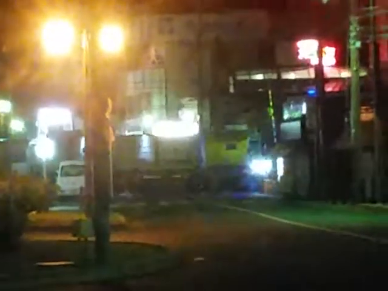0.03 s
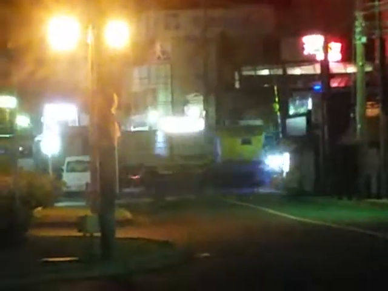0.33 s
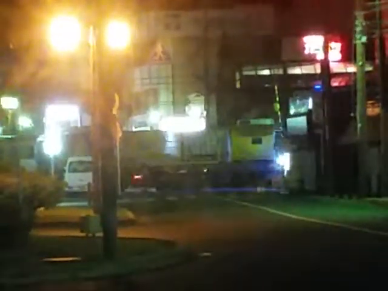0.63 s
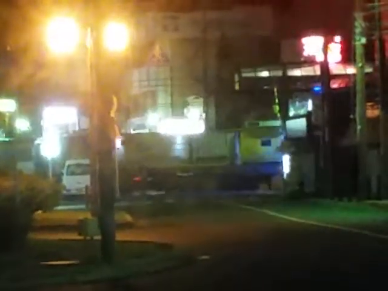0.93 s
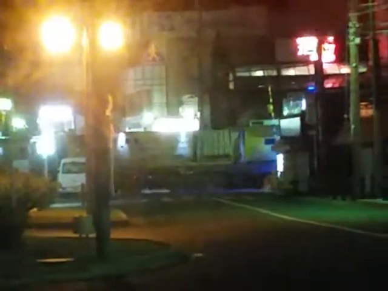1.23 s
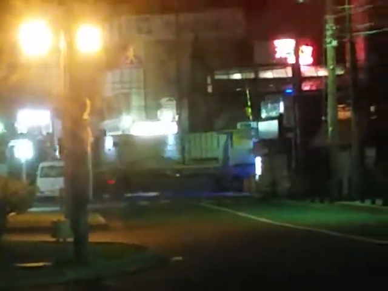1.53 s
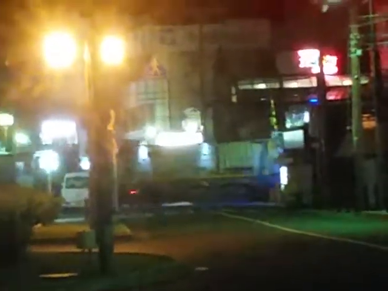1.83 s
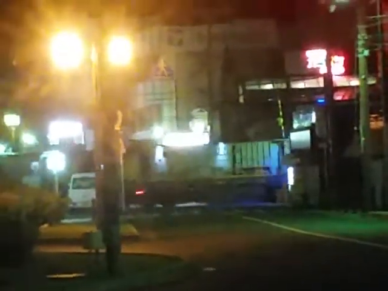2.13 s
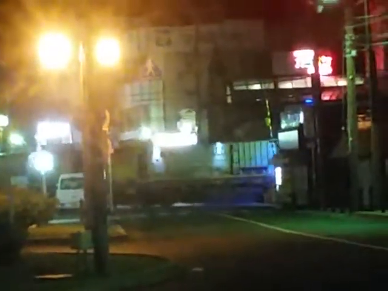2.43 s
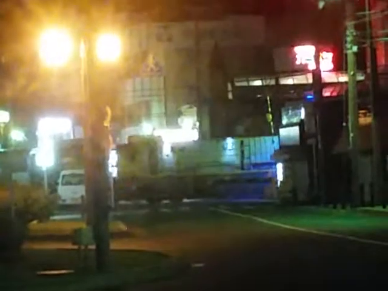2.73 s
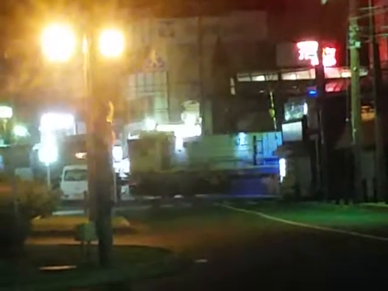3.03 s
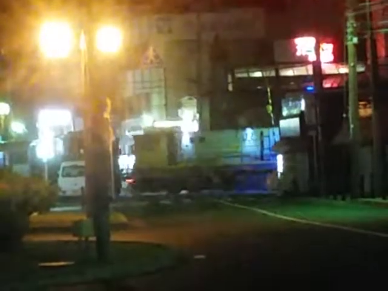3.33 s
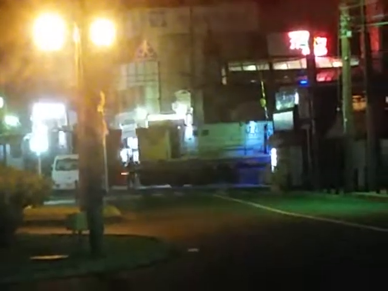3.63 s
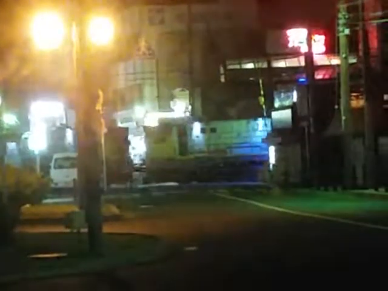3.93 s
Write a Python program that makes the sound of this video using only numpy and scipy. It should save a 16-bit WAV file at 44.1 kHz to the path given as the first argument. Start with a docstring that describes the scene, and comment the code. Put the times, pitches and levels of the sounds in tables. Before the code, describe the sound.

The low, steady diesel engine of a rail vehicle creeps past some way off among buildings. A faint puff of air comes first, then wind bumps the microphone, while soft fan hiss and whine swell and recede.

```python
"""A diesel rail maintenance vehicle creeps through a distant crossing at night, engine speed steady.
From the start, firings ring the exhaust pipe, low notes swell and fade between the buildings, and
fans, gears and pumps hiss and whine, mostly from the right. At 0.2-0.4 s it lets off compressed air.
From 0.6 to 1.9 s a light gust buffets the left microphone port. The machinery is loudest near 2.5 s,
in the open crossing, then recedes while the exhaust chugs on."""
import sys
import numpy as np
from scipy import signal
from scipy.fft import rfft, irfft, next_fast_len
from scipy.io import wavfile
from scipy.ndimage import map_coordinates

SR = 44100
rng = np.random.default_rng(int(sys.argv[2]) if len(sys.argv) > 2 else 0)


def put_to_file(sound):
    """Save the sound as 16-bit audio at rate SR, in the file named by the first command-line argument."""
    columns = np.atleast_2d(sound).T  # one column per channel
    safe = np.clip(columns, -1, 1)
    whole_steps = np.round(safe * 32767)
    wavfile.write(sys.argv[1], SR, whole_steps.astype(np.int16))


N = 176400

# exhaust and street rumble: (frequency [Hz], relative density [dB])
RUMBLE_SPECTRUM = [(12, -45), (28, -16.5), (50, -5), (90, -0.5), (140, -1.5), (220, -1), (300, -6.5),
                   (370, -17.5), (500, -17.5), (650, -29), (1200, -53.5), (3000, -100)]


def amp(db):
    """Decibels to gain."""
    return 10 ** (np.asarray(db) / 20)


def unit(x):
    """Scale to rms 1."""
    return x / np.sqrt(np.mean(x ** 2) + 1e-20)


def along(points, hz):
    """(Hz, value) points on a log axis."""
    f, v = np.transpose(points)
    return np.interp(np.log(hz + 1), np.log(f + 1), v)


def curves(rows):
    """One value per sample for each column after the time."""
    s, *cols = np.transpose(rows)
    return [np.interp(np.arange(N) / SR, s, c) for c in cols]


def wobble(rate):
    """A smooth random curve, rate knots a second."""
    return map_coordinates(rng.standard_normal(1024), [np.arange(N) * rate / SR], mode="wrap")


def filtered(x, response):
    """x times a complex response of frequency."""
    m = next_fast_len(N + SR // 2)
    return irfft(rfft(x, m) * response(np.fft.rfftfreq(m, 1 / SR)), m)[..., :N]


def noise(spectrum, gate=1):
    """Gated white noise, coloured, at rms 1."""
    return unit(filtered(gate * rng.standard_normal(N), lambda hz: amp(along(spectrum, hz))))


def note(turns, multiple, fade_db, smear_rad, rate_hz):
    """One exhaust tone; changing reflections bend level and phase."""
    phase = 2 * np.pi * (multiple * turns + rng.random()) + smear_rad * wobble(rate_hz)
    return np.sqrt(2) * amp(fade_db * wobble(rate_hz)) * np.sin(phase)


def exhaust_notes(turns):
    """Strong and weak tones locked to the crank."""
    strong_multiples = [2, 4, 6, 7, 9, 10, 18]  # (frequency [x crank rate])
    strong_levels = [(0, -42, -39, -31.5, -35, -42, -50.5, -60.5),
                     (0.402, -40, -37, -33, -36, -41, -51.5, -60),
                     (.8, -44.5, -35.5, -34.5, -50.5, -47, -43, -68),
                     (1.249, -42, -35.5, -37.5, -46.5, -42.5, -43, -66.5),
                     (1.48, -45.5, -36.5, -32.5, -53, -44, -43.5, -53),
                     (1.62, -33.5, -36.5, -34, -49, -44, -42.5, -55),
                     (1.761, -34, -38, -38.5, -39, -40, -47.5, -47.5),
                     (1.999, -33.5, -37.5, -49.5, -36.5, -46, -55, -53.5),
                     (2.25, -34, -42, -38, -44.5, -45.5, -49, -50),
                     (2.548, -33.5, -39.5, -37, -40, -44, -52.5, -52),
                     (2.952, -36.5, -36.5, -45, -35, -47, -47, -56.5),
                     (3.298, -42, -37, -36.5, -39, -46, -48.5, -59.5),
                     (3.7, -38.5, -35.5, -39.5, -54.5, -46.5, -48.5, -60.5),
                     (4, -34.5, -31.5, -36, -63, -45.5, -41.5, -54)]  # (time [s], relative level [dB] of each strong multiple)
    weak_notes = [(1, -58), (1.5, -54.5), (3, -57), (3.5, -52.5), (4.5, -45.5), (5, -41), (8, -48),
                  (10.5, -52), (11, -56.5), (12, -57), (13, -59.5), (14, -56)]  # (frequency [x crank rate], relative level [dB])
    strong = sum(amp(db - 1.48) * note(turns, multiple, fade_db=0.25, smear_rad=0.053, rate_hz=3)
                 for multiple, db in zip(strong_multiples, curves(strong_levels)))
    weak = sum(amp(db - 3.5) * note(turns, multiple, fade_db=2.0, smear_rad=0.63, rate_hz=2.11)
               for multiple, db in weak_notes)
    return strong + weak


def exhaust_puffs(turns):
    """Rumble and roar puff twice a turn; the roar rises once clear of the buildings."""
    rumble_level = [(0, -42.5), (.7, -38.5), (1.5, -38.5), (2.1, -39.5), (2.6, -39), (3.2, -39), (4, -38.5)]  # (time [s], level [dB])
    roar_level = [(0, -58), (.6, -55), (1, -48.5), (1.7, -51.5), (2.3, -52), (2.9, -49), (3.5, -51),
                  (4, -54)]  # (time [s], level [dB])
    roar_spectrum = [(150, -38.5), (280, -11.5), (350, 2), (430, -2), (510, -3), (650, -16), (1200, -47),
                     (3000, -89.5)]  # (frequency [Hz], relative density [dB])
    puffs = amp(1.8 * np.cos(2 * np.pi * 2 * turns) + 2.1 * np.cos(2 * np.pi * turns))
    rumble = amp(curves(rumble_level)[0]) * noise(RUMBLE_SPECTRUM, puffs)
    roar = amp(curves(roar_level)[0]) * noise(roar_spectrum, puffs)
    return rumble + roar


def exhaust_chug(turns):
    """Uneven firings, two a turn, ring the muffled pipe and echo off walls."""
    cylinders = [(-0.0012, 3.5), (0.077, -1), (.16, 3), (-0.11, -1.5)]  # (lag [firing intervals], strength [dB])
    pipe_modes = [(143, 51.6, -1.5), (213, 95, 0.5), (288, 60, -1.5), (397, 59, -15)]  # (frequency [Hz], width [Hz], gain [dB])
    wall_echoes = [(0.018, -11), (.057, -7.5), (0.12, -9.5)]  # (delay [s], gain [dB])
    chug_level = [(0, -42.5), (.5, -40.5), (1, -43), (1.6, -38), (2.1, -42), (2.6, -37.5), (3.3, -37),
                  (4, -41.5)]  # (time [s], level [dB])
    scatter_db, jitter_s, muffler_hz = 2.5, 0.00032, 492
    firings = np.arange(int(2 * turns[-1]))
    lag, strength_db = np.array(cylinders)[firings % len(cylinders)].T
    late, strong = rng.standard_normal((512, 2))[:len(firings)].T
    onsets_s = np.interp(firings + lag, 2 * turns, np.arange(N) / SR) + jitter_s * late
    onset_samples = np.clip(onsets_s * SR, 0, N - 1).astype(int)
    pulses = np.bincount(onset_samples, amp(strength_db + scatter_db * strong), N)

    def pipe_and_walls(hz):
        pipe = sum((-1) ** k * amp(db) * 1j * hz * width / (centre ** 2 - hz ** 2 + 1j * hz * width)
                   for k, (centre, width, db) in enumerate(pipe_modes))
        walls = 1 + sum(amp(db) * np.exp(-2j * np.pi * hz * delay_s) for delay_s, db in wall_echoes)
        return pipe * walls

    muffler = signal.butter(4, muffler_hz, fs=SR, output="sos")
    chug = signal.sosfilt(muffler, filtered(pulses, pipe_and_walls))
    return amp(curves(chug_level)[0]) * unit(chug)


def whine(hz, smear_rad, throb_db, throb_hz=5.3):
    """Gear or pump tone: throbs, flutters, wavers in phase."""
    t = np.arange(N) / SR
    level_db = throb_db * np.sin(2 * np.pi * throb_hz * t + 1.6 * wobble(2.6))
    flutter_db = 1.1 * wobble(7) + 1.1 * wobble(45)
    phase = 2 * np.pi * (hz * t + rng.random()) + smear_rad * wobble(14)
    return unit(amp(level_db + flutter_db) * np.sin(phase))


def machinery(turns):
    """Whines, high hiss and faintly clattering fan rush, loudest mid-crossing."""
    whine_tones = [(985, -70, .5, 1), (1182, -74, .2, 1), (1379, -69, .4, 1), (1569, -71, 2.2, 1),
                   (1631, -61, .3, 1), (2005, -76, 1.4, 2), (2165, -68, .7, 4), (2360, -78, 2, 1),
                   (2444, -76.5, 1.6, 1), (2562, -75.5, .3, 1), (2719, -76, .3, 1), (2758, -80, .4, 1),
                   (2836, -80, .3, 1), (2875, -79.5, .4, 1), (3149, -85, .4, 1), (3623, -85.5, .3, 1),
                   (3741, -81, .3, 1)]  # (frequency [Hz], level [dB], phase waver [rad], throb [dB])
    whine_gain = [(0, -3), (.6, -2), (1.1, 0), (1.8, 1.5), (2.6, 1.5), (3.1, -1.5), (4, -4)]  # (time [s], gain [dB])
    hiss_level = [(0, -88.5), (1, -79), (1.7, -70.5), (2.1, -72), (2.5, -68.5), (3.1, -77), (4, -89)]  # (time [s], level [dB])
    hiss_spectrum = [(1500, -33.5), (2600, -3.5), (3250, -4), (3750, 4.5), (4150, 1.5), (4400, -18),
                     (4650, -8.5), (5000, -8.5), (5300, -21), (5600, -31.5), (6300, -42), (15000, -57)]  # (frequency [Hz], relative density [dB])
    fan_level = [(0, -57.5), (.5, -56), (1, -55), (1.7, -55.5), (2.5, -54.5), (3, -56), (3.5, -55.5),
                 (4, -57.5)]  # (time [s], relative level [dB])
    fan_spectrum = [(200, -9), (600, -3), (800, 2), (1200, 1.5), (1500, 2.5), (1680, 2.5), (1980, -4.5),
                    (2450, -3.5), (2800, -10.5), (3200, -16.5), (3800, -16.5), (4150, -20), (4450, -29),
                    (5100, -30.5), (5600, -48.5), (6500, -57), (15000, -51.5)]  # (frequency [Hz], relative density [dB])
    clatter = amp(0.32 * np.cos(2 * np.pi * 2 * turns) + 0.76 * wobble(90) + 0.73 * wobble(8.3))
    whines = sum(amp(db) * whine(hz, smear_rad, throb_db)
                 for hz, db, smear_rad, throb_db in whine_tones)
    hiss = amp(curves(hiss_level)[0] + 1.1 * wobble(11)) * noise(hiss_spectrum)
    fan = amp(curves(fan_level)[0] + 2.5) * noise(fan_spectrum, clatter)
    return fan + hiss + amp(curves(whine_gain)[0]) * whines


def street():
    """Diffuse rumble and wash from the buildings, at one port."""
    wash_spectrum = [(100, 3.5), (500, -5), (750, -5.5), (1200, -10), (1700, -9.5), (2100, -13.5),
                     (3800, -23), (4500, -35.5), (5000, -32), (5500, -46), (6300, -53), (15000, -38.5)]  # (frequency [Hz], relative density [dB])
    rumble = amp(-48.5 + 4.0 * wobble(10)) * noise(RUMBLE_SPECTRUM)
    wash = amp(-56.0 + 0.71 * wobble(20)) * noise(wash_spectrum)
    return rumble + wash


def air_release():
    """Compressed air swells, shuts off and lingers between the buildings."""
    air_spectrum = [(1500, -27), (3000, -6.5), (4300, -3), (5300, 1), (5800, -8.5), (6700, -24.5),
                    (8300, -32.5), (15000, -20.5)]  # (frequency [Hz], relative density [dB])
    open_s, shut_s, peak_db, echo_db = 0.2, 0.405, -68.5, -15
    rise_db_per_s, fall_db_per_s, echo_db_per_s = 134, 451, 32.5
    t = np.arange(N) / SR
    swell_db = -rise_db_per_s * np.maximum(shut_s - t, 0)
    since_shut_s = np.maximum(t - shut_s, 0)
    jet = amp(swell_db - fall_db_per_s * since_shut_s)
    echo = amp(echo_db + swell_db - echo_db_per_s * since_shut_s)
    return amp(peak_db) * (t > open_s) * np.hypot(jet, echo) * noise(air_spectrum)


def wind_gust(lump_db=1.8, right_db=-32.5):
    """Lumpy buffeting and single thumps, nearly all on the left port."""
    gust_level = [(0, -50.5), (.6, -42), (.8, -44), (.92, -29.5), (1.04, -41), (1.2, -32.5), (1.5, -31.5),
                  (1.66, -33), (1.9, -44.5), (2.4, -46.5), (4, -45)]  # (time [s], level [dB])
    buffet_spectrum = [(10, -38), (25, -9.5), (50, 9), (120, -1), (200, -8), (300, -4.5), (450, -24),
                       (700, -42), (2000, -83.5)]  # (frequency [Hz], relative density [dB])
    wind_thumps = [(.762, -25, 90, .004), (.862, -23, 125, .004), (.918, -16, 75, .0045),
                   (1.264, -20, 135, .006), (1.349, -18.5, 100, .004), (1.451, -11.5, 130, .003),
                   (1.521, -21.5, 190, .007), (1.612, -22, 105, .004), (1.688, -23, 90, .004)]  # (time [s], level [dB], pitch [Hz], half width [s])
    buffet = amp(curves(gust_level)[0] + lump_db * wobble(22)) * noise(buffet_spectrum)
    for centre_s, db, hz, half_width_s in wind_thumps:
        offset_s = np.arange(N) / SR - centre_s
        envelope = amp(db) * np.exp(-(offset_s / half_width_s) ** 2 / 2)
        buffet -= envelope * np.sin(2 * np.pi * hz * offset_s)
    return np.array([buffet, amp(right_db) * buffet])


def from_right(x, left_lead_s=0.00018):
    """Mono to stereo; the left port is shaded, most in the treble."""
    port_balance = [(60, -2.5), (110, -3.5), (170, -4.5), (260, -7.5), (500, -5), (700, -13.5),
                    (1100, -21.5), (1800, -24.5), (4700, -26)]  # (frequency [Hz], left minus right [dB])

    def ports(hz):
        ratio = amp(along(port_balance, hz))
        left = ratio * np.exp(2j * np.pi * hz * left_lead_s)
        return np.array([left, np.ones_like(hz)]) * 2 / (1 + ratio)

    return filtered(x, ports)


def scene():
    """Vehicle, street and wind, in stereo."""
    crank_hz, relative_drift = 30.22, 0.00077
    turns = np.cumsum(crank_hz * (1 + relative_drift * wobble(2.99))) / SR
    exhaust = exhaust_notes(turns) + exhaust_puffs(turns) + exhaust_chug(turns)
    vehicle = exhaust + machinery(turns) + air_release()
    return from_right(vehicle) + np.array([street(), street()]) + wind_gust()


def record(dry):
    """Brick-wall low-pass."""
    top_hz = 15700
    return filtered(dry, lambda hz: hz < top_hz)


dry = scene()
out = record(dry)
put_to_file(out)
```